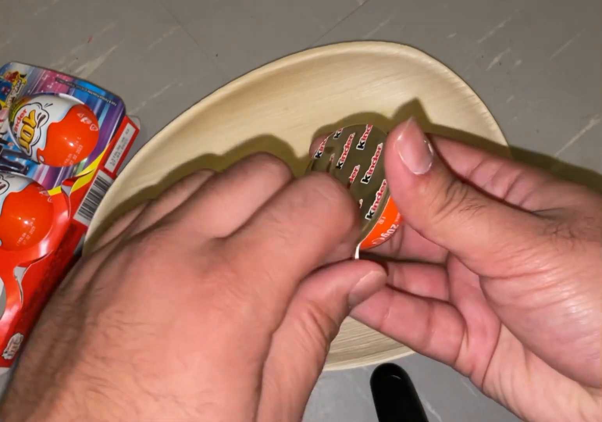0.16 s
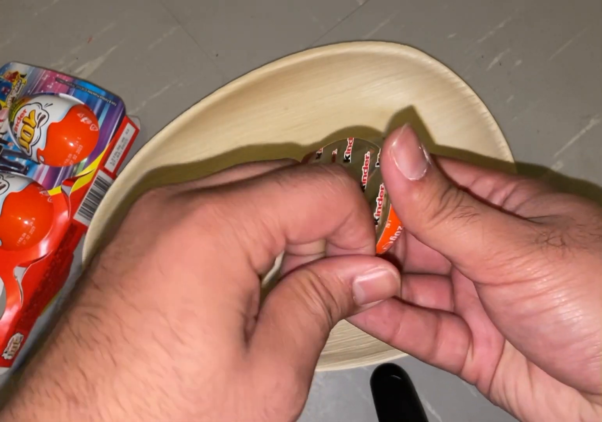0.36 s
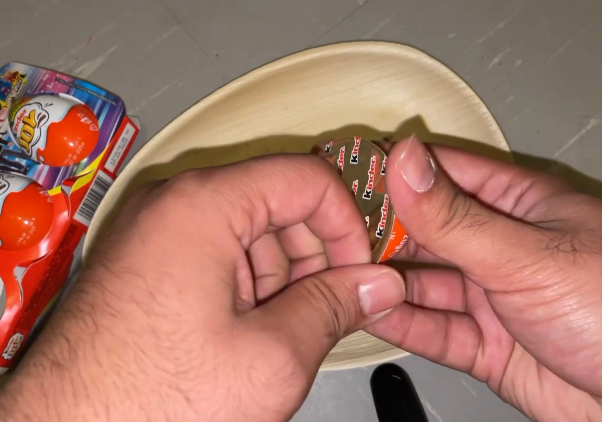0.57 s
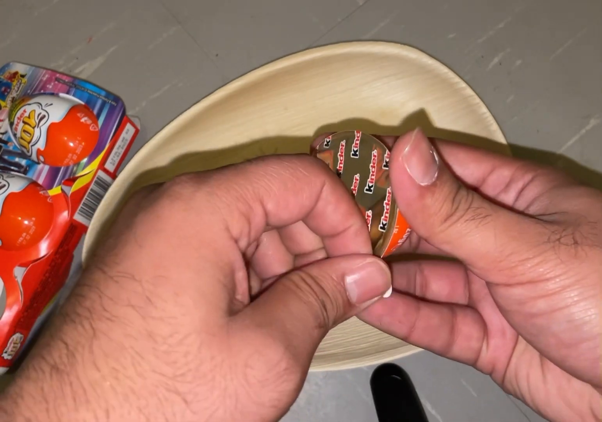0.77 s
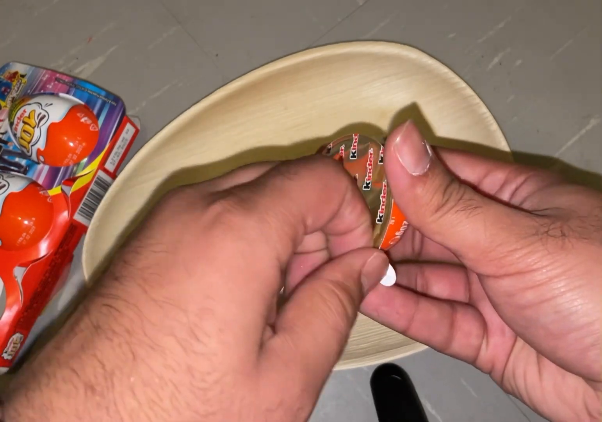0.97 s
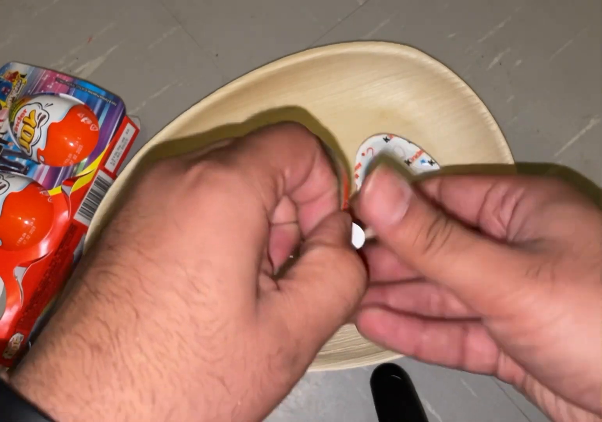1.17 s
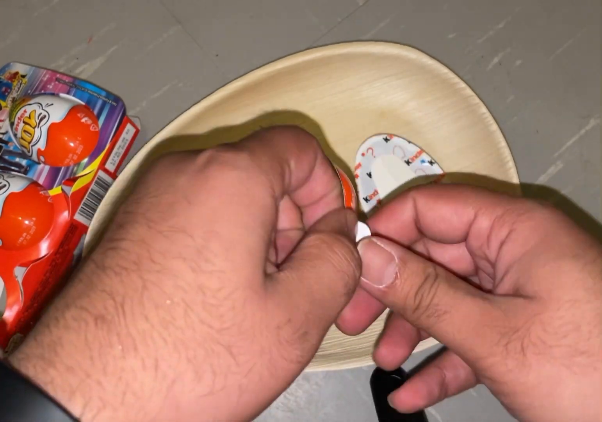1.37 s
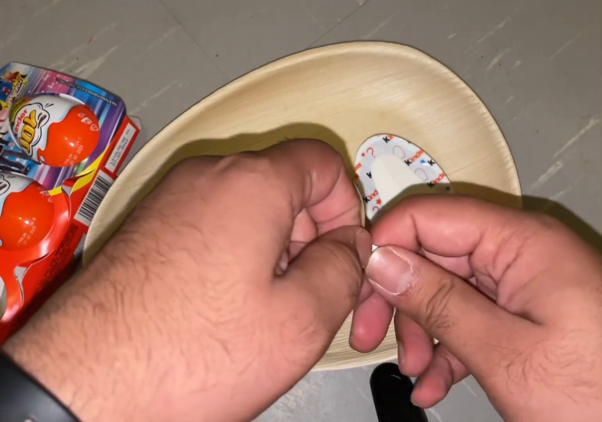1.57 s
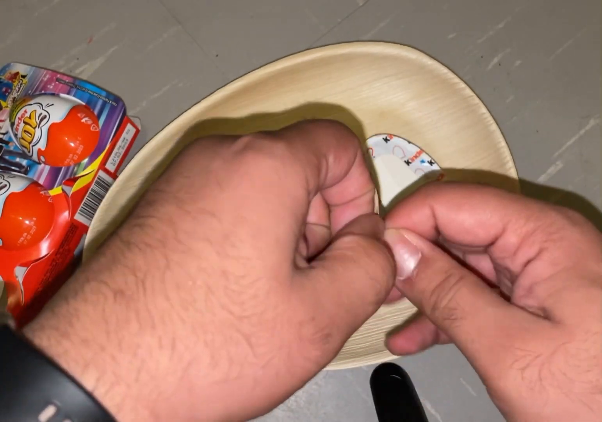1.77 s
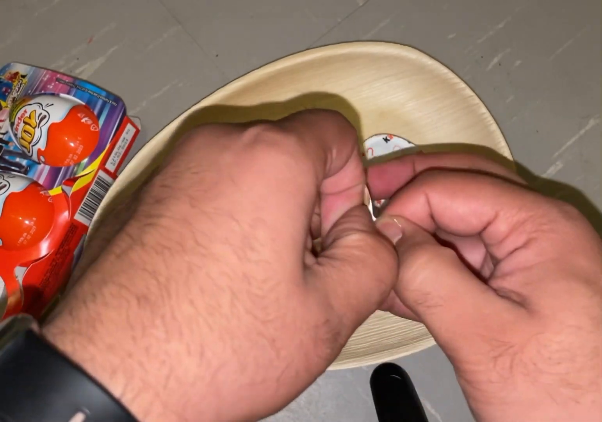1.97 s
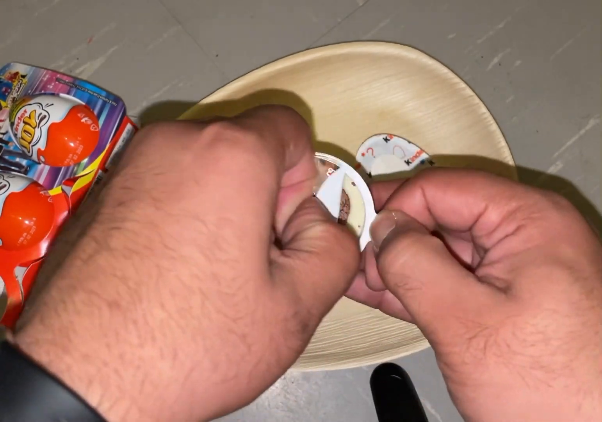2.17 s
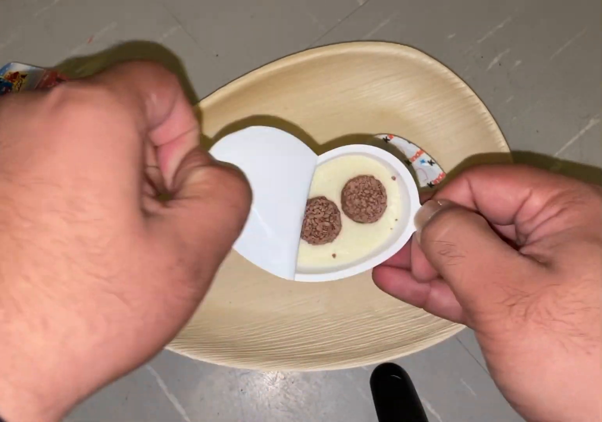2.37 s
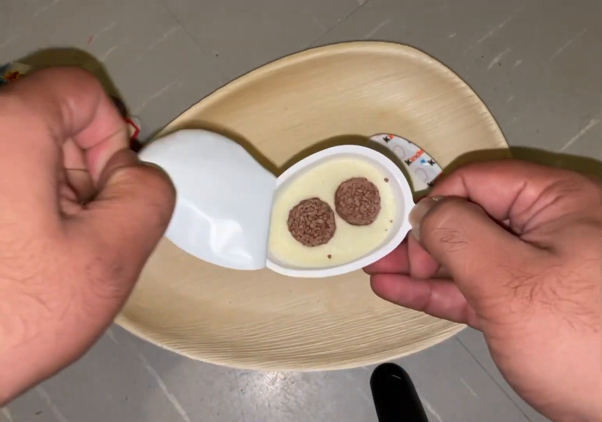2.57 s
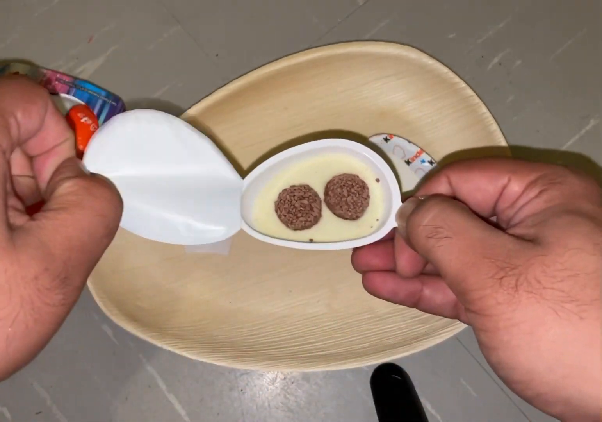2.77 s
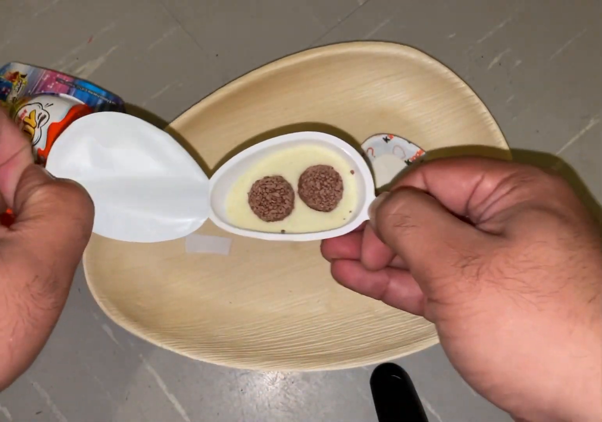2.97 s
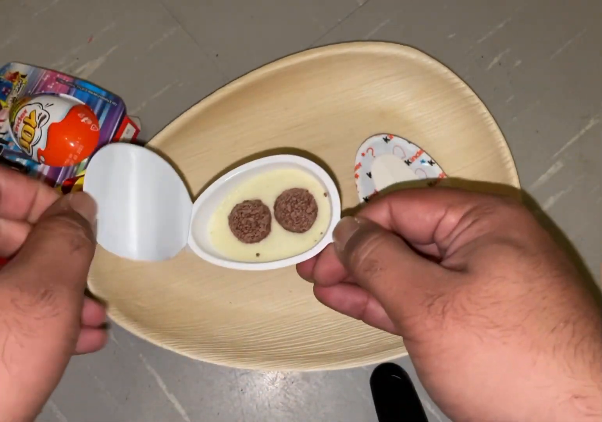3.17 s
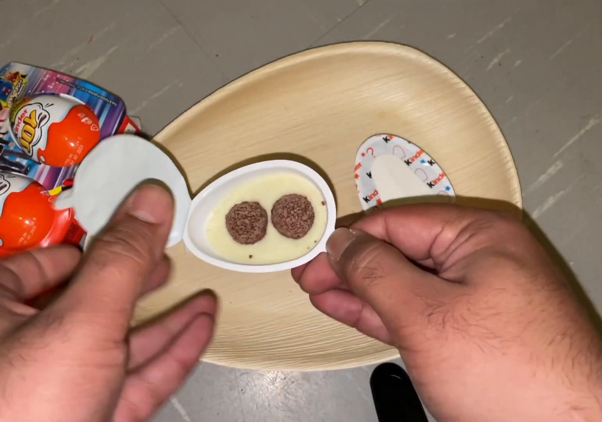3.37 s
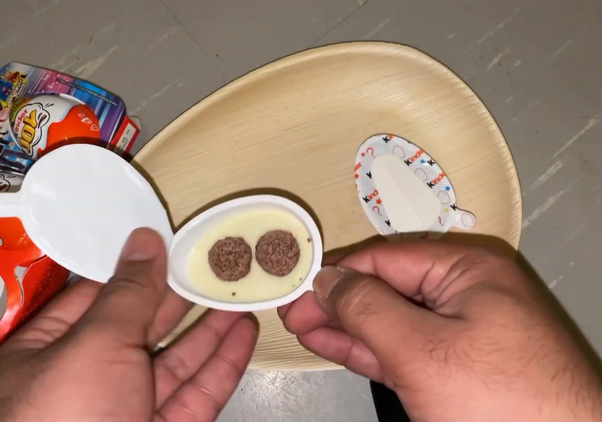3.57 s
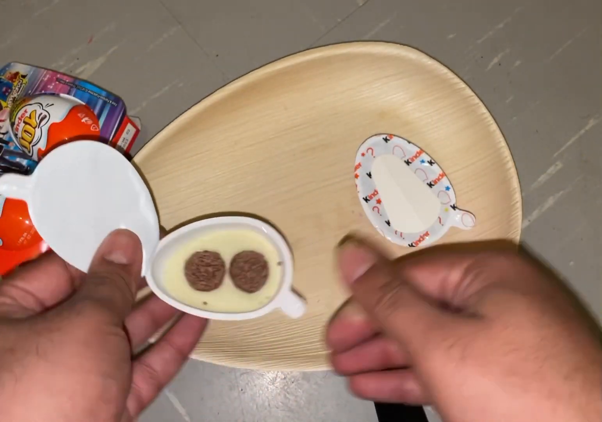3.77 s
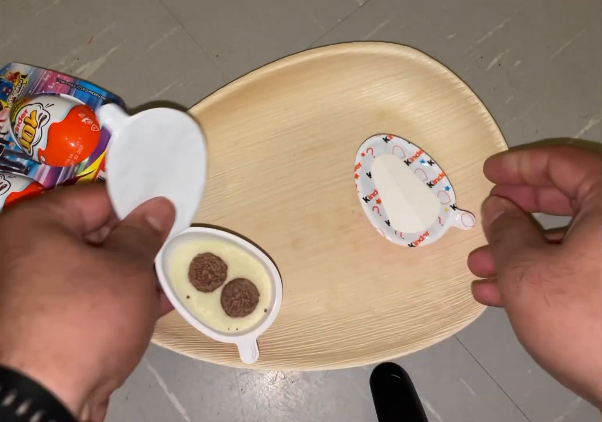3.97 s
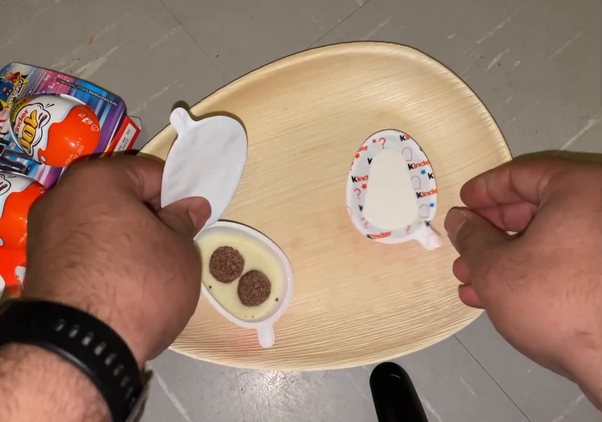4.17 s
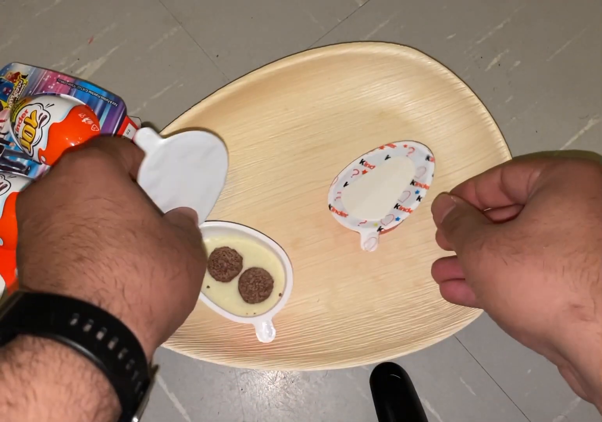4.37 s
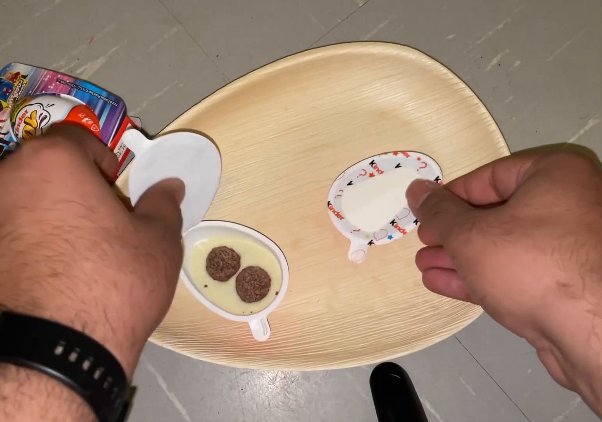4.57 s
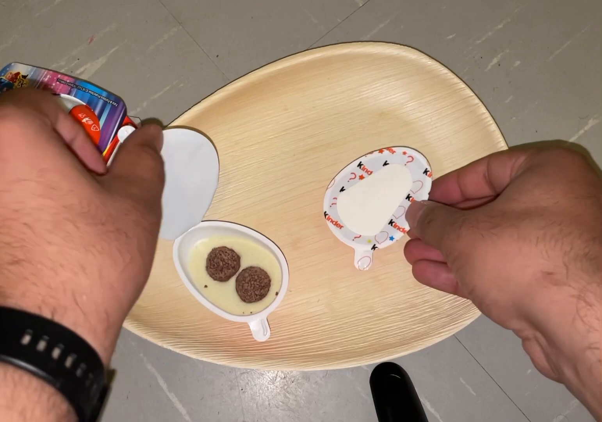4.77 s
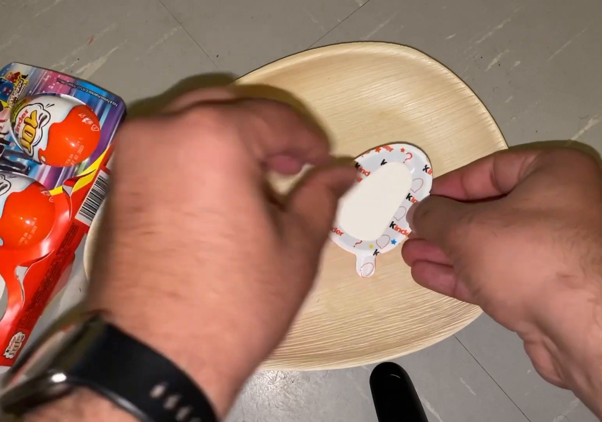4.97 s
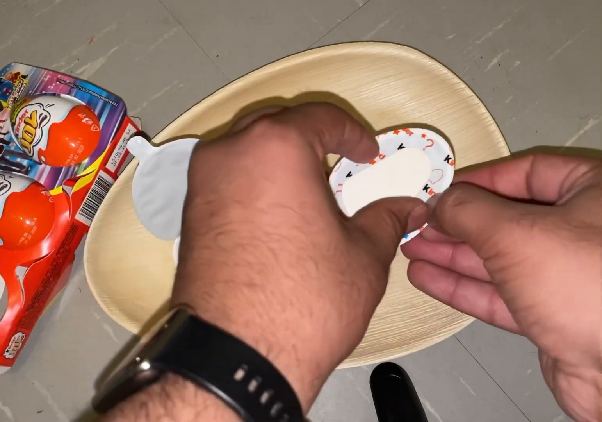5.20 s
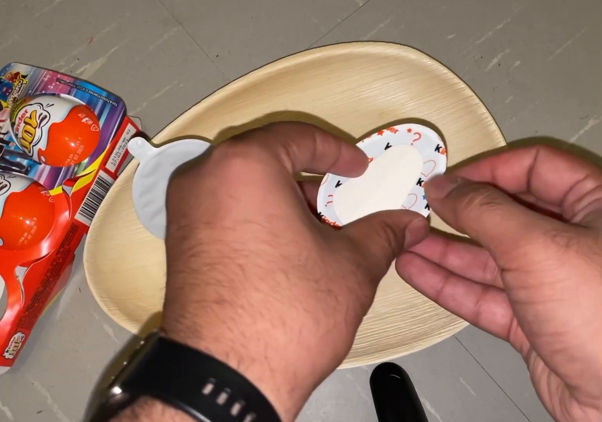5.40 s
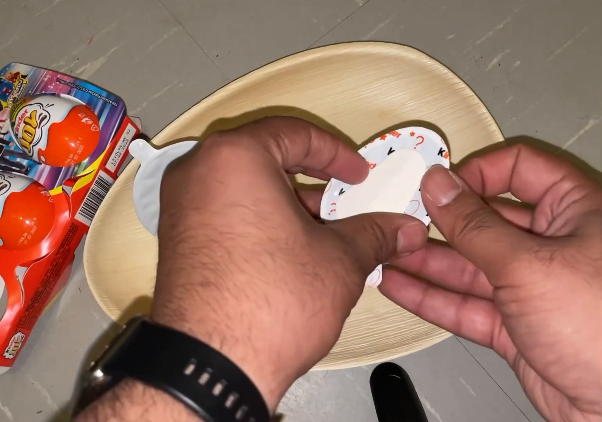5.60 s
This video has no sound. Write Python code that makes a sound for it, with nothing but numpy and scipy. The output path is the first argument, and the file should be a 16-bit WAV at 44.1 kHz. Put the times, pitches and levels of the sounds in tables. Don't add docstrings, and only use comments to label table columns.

```python
import sys
import numpy as np
from scipy import signal
from scipy.fft import rfft, irfft, next_fast_len
from scipy.io import wavfile
from scipy.ndimage import uniform_filter1d

SR = 44100
rng = np.random.default_rng(int(sys.argv[2]) if len(sys.argv) > 2 else 0)


def int16_out(signal):
    q = np.round(np.clip(np.atleast_2d(signal).T, -1, 1) * 32767)
    wavfile.write(sys.argv[1], SR, q.astype(np.int16))


def volts_from_decibels(level):
    exponent = np.asarray(level, float) / 20
    return 10 ** exponent


N = 248724

# (frequency [Hz], level [dB])
FOIL = [(900, -30), (1500, -6), (2400, -4.5), (3700, -1.5), (5300, -4.5), (7500, -6.5), (9000, -19),
        (11000, -55)]
CAVITY = 1980, 160, .7


def evened(x):
    return x / np.sqrt(np.mean(x ** 2) + 1e-20)


def peaked(x, db):
    return x * volts_from_decibels(db) / abs(x).max()


def read(points, hz):
    f, value = np.transpose(points)
    return np.interp(np.log(hz + 1), np.log(f + 1), value)


def add(mix, s, sound):
    part = mix[..., round(s * SR):][..., :sound.shape[-1]]
    part += sound[..., :part.shape[-1]]


def causal(points):
    half = np.log(volts_from_decibels(read(points, np.fft.rfftfreq(2048, 1 / SR))))
    full = np.r_[half, half[-2:0:-1]]
    phase = -signal.hilbert(full).imag
    taps = np.fft.ifft(np.exp(full + 1j * phase)).real[:1024]
    return taps / np.linalg.norm(taps)


def ring(x, hz, width):
    pole = np.exp((2j * hz - width) * np.pi / SR)
    return 2 * signal.lfilter([1 - abs(pole)], [1, -pole], x).real


def hollow(x):
    hz, width, _ = CAVITY
    return ring(x, hz, width)


def lean(s):
    # (time [s], left over right [dB])
    hands = [(0, 4), (2, 5), (2.7, 6), (3.2, 6.5), (3.6, 5), (4.2, 5.5), (5.6, 3)]
    db = np.interp(s, *np.transpose(hands)) / 2
    return volts_from_decibels(np.array([db, -db]).reshape(2, -1))


def air():
    # (frequency [Hz], density [dB per Hz])
    spectrum = [(12, -34), (20, -1), (81, -3.5), (234, -18.5), (347, -15.5), (485, -21.5), (698, -37.5),
                (759, -37), (897, -44.5), (2020, -48), (5230, -48), (8890, -53.5), (13900, -43.5),
                (16000, -59)]
    # (frequency [Hz], left-right likeness [ratio])
    likeness = [(60, 0.9), (400, 0.73), (1500, 0.72), (5000, 0.46), (13000, 0.99823)]
    frames, hz = N // 256 + 5, np.fft.rfftfreq(1024, 1 / SR)
    t = np.arange(frames) * 256 / SR
    a, b, c, d, patches = rng.standard_normal((frames, 513, 5)).T
    patches = uniform_filter1d(uniform_filter1d(patches, 10, 0), 16, 1)
    patches_db = 0.66 * evened(patches)
    creep_db = np.where(hz[:, None] < 85, 0, 1.3941 * t - 6)
    fading_db = 6 * np.exp(-t / 0.84)
    same = read(likeness, hz)[:, None]
    left = a + 1j * b
    right = same * left + np.sqrt(1 - same ** 2) * (c + 1j * d)
    level_db = read(spectrum, hz)[:, None] + patches_db + creep_db + fading_db
    z = np.array([left, right]) * volts_from_decibels(level_db)
    noise = signal.istft(z, nperseg=1024, noverlap=768)[1][:, :N]
    return volts_from_decibels(-67) * volts_from_decibels([[.9], [-.9]]) * evened(noise)


def room(x):
    # (frequency [Hz], t60 [s])
    walls = [(150, 0.52), (600, 0.33), (2000, 0.28), (5000, 0.3), (12000, 0.26), (15500, .14)]
    # (frequency [Hz], left-right likeness [ratio])
    likeness = [(100, 0.66), (500, 0.43), (2000, 0.16), (5000, 0.28), (8000, 0.53), (14000, 0.78)]
    taps = np.zeros((9, 30000))
    at = np.arange(200, 29980, 20) + rng.integers(0, 20, (9, 1489))
    np.put_along_axis(taps, at, rng.choice([-1., 1.], at.shape), 1)
    hz, t, z = signal.stft(taps, SR, nperseg=256)
    same = np.clip(read(likeness, hz), 0, 1)[:, None]
    own, common = z[:6].reshape(2, 3, *z.shape[1:]), z[6:]
    z = np.sqrt(same) * common + np.sqrt(1 - same) * own
    dying = volts_from_decibels(-60 * t / read(walls, hz)[:, None])
    tails = signal.istft(z * dying, SR, nperseg=256)[1]
    tails = tails / np.linalg.norm(tails[0, 0])
    turns = 2.3 * np.arange(N) / SR + np.arange(3)[:, None] / 3
    shares = np.cos(2 * np.pi * turns) * np.sqrt(2 / 3)
    return signal.fftconvolve((x * shares)[None], tails, axes=2).sum(1)[:, :N]


def plate(x):
    taps = np.zeros((2, 400))
    at = rng.integers(12, 400, (2, 7))
    echoes = .33 * rng.choice([-1., 1.], at.shape) * np.exp(-at / 250)
    np.put_along_axis(taps, at, echoes, 1)
    taps = signal.lfilter(*signal.butter(N=2, Wn=(1100, 6500), btype="band", fs=SR), taps)
    return x + signal.oaconvolve(x, taps, axes=1)[:, :N]


def blows(table, cycles, partner_db, top, grip):
    out, t = np.zeros(N), np.arange(9000) / SR
    for s, db, hz, t60 in table:
        phase = t * hz / cycles
        blow = phase * np.exp(-phase)
        grit = rng.standard_normal(len(t)) * blow ** 0.19
        width = 2.7 / (grip * t60)
        ratios = np.array([.58, .78, 1.3, 1.75, 2.4]) * rng.uniform(1.0, 1.08, 5)
        others = sum(ring(grit, hz * k, 1.1 * width) for k in ratios)
        body = peaked(ring(blow, hz, width), 0) + peaked(others, partner_db)
        band = signal.butter(N=2, Wn=(0.44 * hz, top * hz), btype="band", fs=SR)
        add(out, s, peaked(signal.lfilter(*band, body), db))
    return out


def knocking():
    # (time [s], peak [dB], ring [Hz], t60 [s])
    cup_knocks = [(0.121, -45, 958, 0.01594), (0.1885, -34.5, 757.3, 0.02751), (0.765, -51.5, 690, 0.03094),
                  (2.015, -53, 1976, 0.05176), (2.0545, -28, 1900, 0.0508), (2.056, -26, 954.7, 0.0358),
                  (2.062, -23, 1008, 0.02115), (2.0886, -16, 1050, 0.018), (2.192, -41, 1403, 0.05676),
                  (2.232, -21, 868, 0.01887), (2.253, -25, 813, 0.036), (2.278, -11.5, 968, 0.0499),
                  (2.312, -21, 760.2, 0.08088), (2.3622, -24, 600, 0.02058), (2.5487, -16.5, 910, 0.009828),
                  (2.782, -30, 420.9, 0.0686), (2.802, -38, 957.3, 0.037), (2.829, -44.5, 949.4, 0.03872),
                (3.07, -32, 711.2, 0.01253), (3.093, -41.5, 942.4, 0.02384), (3.143, -40.5, 784.7, 0.02),
                (3.288, -42.5, 599.8, 0.0234), (3.3251, -42, 1432, 0.025), (3.329, -42.5, 637, 0.0256),
                (3.3325, -42.5, 1296, 0.02544), (3.343, -51, 700.2, 0.0388), (3.352, -53.5, 1100, 0.0289),
                (3.376, -55.5, 949.8, 0.01515), (3.588, -54, 560.1, 0.03076), (3.622, -37.5, 886.4, 0.0344),
                (3.63, -46, 403.2, 0.0803), (3.742, -51, 1033, 0.0726), (4.084, -56, 1243, 0.0472),
                (4.119, -49, 1331, 0.05848), (4.148, -48, 1326, 0.1923), (4.172, -41, 1322, 0.01226),
                (4.183, -41.5, 330, 0.05308), (5.202, -52.5, 383.4, 0.0514)]
    # (time [s], peak [dB], ring [Hz], t60 [s])
    thumps = [(2.088, -43.5, 299.1, 0.2), (2.19, -55.5, 140, .15), (2.311, -39, 285, 0.07),
              (2.327, -36.5, 115, 0.088), (2.362, -32.5, 379.1, 0.07185), (2.548, -27, 311.2, 0.04529),
              (2.55, -25.5, 430.2, 0.03107), (2.557, -35, 104, 0.17), (2.8, -40.5, 382.2, 0.09975),
              (2.81, -45.5, 82.01, 0.095), (3.069, -46, 330, 0.09843), (3.102, -48, 131.9, 0.03667),
              (3.323, -47, 96.32, 0.11), (4.199, -44.5, 145.4, 0.1271), (4.214, -48.5, 83.74, 0.35),
              (5.204, -52, 215.6, 0.05382)]
    body = blows(cup_knocks, cycles=.15, partner_db=-1.8, top=3.5, grip=0.87)
    body = body + blows(thumps, cycles=0.28, partner_db=-1.5, top=4.3, grip=0.96)
    body = body + 1.3 * hollow(body)
    return body * volts_from_decibels([[1.3], [-1.3]])


def handling():
    # (start [s], foil [dB], time to fall 20 dB [s], fizz re foil [dB], cup re foil [dB])
    settles = [(0.0, -62.5, 0.0007, 2, -9.5), (.13, -60, 0.1403, -22, -9), (.775, -67, 0.0555, 1.5, -4),
               (1.12, -86, 0.0619, 19, -14), (1.72, -80.5, 0.1519, 5.5, -8.5),
               (2.1, -46, 0.1105, -21, -2.5), (2.24, -40.5, 0.1011, -9.5, -5),
               (2.28, -33, 0.0278, -19.5, -7), (2.29, -40, 0.1115, -9, -3), (2.555, -56, 0.0665, -3, 4),
               (2.6, -60, 0.1367, -2.5, -1), (2.792, -77, 0.0902, 4.5, 23.5),
               (3.15, -57.5, 0.09, -8.5, -7.5), (3.34, -68.5, 0.0171, -7, 10.5),
               (3.59, -64, 0.0534, 1, 6.5), (3.8, -84, 0.2294, 0, -11), (4.2, -61, 0.1527, -7.5, -7),
               (4.635, -71.5, 0.2194, 0, -14.5), (4.724, -64, 0.0919, -2.5, -4.5)]
    # (middle [s], foil [dB], time to fall 20 dB each side [s], fizz re foil [dB], panel resonance [Hz])
    strokes = [(.09, -76, 0.3392, -5, 1401), (.075, -73, 0.1774, -13.5, 950.3),
               (.185, -59, 0.0831, -10.5, 2129), (.385, -84.5, 0.1241, 5, 2703), (.54, -77, 0.07, 0, 4201),
               (.6, -75, 0.0438, 0, 3799), (1.0, -76, 0.0733, 3.5, 3905), (1.085, -73, 0.0908, 1.5, 1800),
               (1.42, -83, 0.1379, 2.5, 2000), (1.55, -75, 0.1227, 9.5, 1251),
               (1.86, -86, 0.5035, 4.5, 2000), (1.98, -82, 0.0331, 13.5, 3800),
               (2.018, -65, 0.0099, 0.5, 1996), (2.225, -41.5, 0.0316, -7.5, 1700),
               (2.51, -61, 0.071, -7, 1700), (3.72, -80, 0.1761, 7.5, 3492), (4.1, -63, 0.0296, 1.5, 2200),
               (4.145, -53, 0.0365, -8.5, 2122), (4.37, -72, 0.0863, 4, 3880),
               (4.52, -78, 0.1742, -6, 1700), (4.86, -78, 0.1159, 2, 1500), (4.98, -84, 0.1161, 0, 1450),
               (5.1, -81, 0.1325, -15, 1100), (5.255, -64.5, 0.0978, -8, 1801),
               (5.32, -61, 0.0746, -7, 1900), (5.36, -57.5, 0.0474, -6, 1800), (5.42, -64, 0.0626, 1, 2400),
               (5.44, -68, 0.0022, -6.5, 3503), (5.5, -75, 0.0128, 5, 2500), (5.57, -70, 0.0573, 6, 2100)]
    t = np.arange(0, N + 64, 64) / SR
    touches = []
    for s, db, fall, fizz_db, cup_db in settles:
        course_db = db + np.where(t < s, -99, -20 * (t - s) / fall)
        touches.append((course_db, fizz_db, cup_db, 2200))
    for s, db, fall, fizz_db, hz in strokes:
        course_db = db - 20 * abs((t - s) / fall) ** 2.3
        cup_db = -7 - 9 * np.log2(hz / 2000)
        touches.append((course_db, fizz_db, cup_db, hz))
    foil_db, fizz_db, cup_db, hz = map(np.array, zip(*touches))
    power = volts_from_decibels(2 * np.maximum(foil_db, -150))
    rest = volts_from_decibels(-96)
    rows = [np.sqrt(volts_from_decibels(2 * db) @ power) + rest for db in (0 * hz, fizz_db, cup_db)]
    rows.append(hz @ power / power.sum(0))
    return np.repeat(rows, 64, axis=1)[:, :N]


def rubbing():
    # (frequency [Hz], level [dB])
    skin = [(6500, -30.5), (8500, -6), (10500, -4), (13000, -1.5), (14200, -8), (15800, -17)]
    # (frequency [Hz], level [dB])
    cup = [(300, -30), (550, -6), (800, 2), (1200, 4), (1800, -12), (3000, -40)]
    t, out = np.arange(N) / SR, np.zeros((2, N))
    *level, panel_hz = handling()
    clumps = evened(uniform_filter1d(rng.standard_normal(N), 500))
    level = uniform_filter1d(level, 300) * volts_from_decibels(2.2 * clumps - 2.0)
    grains = rng.standard_normal((3, N)) * volts_from_decibels(1.6 * rng.exponential(1, (3, N)))
    grains *= rng.random((3, N)) < .3
    turn, r = np.exp(2j * np.pi * np.cumsum(panel_hz) / SR), np.exp(-np.pi * 750 / SR)
    panel = 2 * (turn * signal.lfilter([1 - r], [1, -r], grains[0] / turn)).real
    grains[0] += 3.1 * panel
    places = lean(t), 1, lean(t)
    for gain, grit, colour, place in zip(level, grains, (FOIL, skin, cup), places):
        out += gain * place * evened(signal.oaconvolve(grit, causal(colour))[:N])
    return out


def snaps():
    # (time [s], peak [dB], fizz above 9 kHz [dB], panel resonance [Hz])
    cracks = [(0.0085, -53, -66.5, 3255), (0.0964, -75, -77, 4339), (0.3684, -66.5, -61, 4160),
              (0.764, -41.5, -38, 3833), (1.4475, -58.5, -91, 1632), (1.7059, -51.5, -49, 6354),
              (1.7952, -75.5, -58, 6390), (2.0163, -58, -61.5, 2000), (2.0184, -54, -49, 2058),
              (2.0533, -24.5, -34, 1926), (2.0685, -12, -30.5, 2038), (2.2544, -19, -36, 4999),
              (2.3621, -25.5, -63.5, 3174), (2.5483, -19.5, -30.5, 2000), (2.7891, -52, -64, 3690),
              (3.1056, -33.5, -54, 1970), (3.143, -19, -25, 5451), (4.0931, -40.5, -60.5, 3550),
              (4.1004, -38.5, -58.5, 1501), (4.3394, -77, -64, 3410), (5.2011, -33.5, -52, 2099),
              (5.3445, -52, -74, 1485)]
    # (time [s], peak [dB], fizz above 9 kHz [dB], panel resonance [Hz])
    buckles = [(0.1883, -27, -55, 3347), (0.5988, -58.5, -90.5, 3550), (0.61, -52.5, -73, 1964),
               (0.9294, -81, -79, 3693), (1.078, -47.5, -50, 3773), (1.3894, -85, -84.5, 1820),
               (1.504, -61, -76, 3366), (2.0614, -19.5, -38.5, 4278), (2.0882, -12, -33.5, 4087),
               (2.1915, -43, -60, 1521), (2.23, -8, -16.5, 4981), (2.2328, -15.5, -24, 2573),
               (2.2772, -6, -24.5, 2709), (2.803, -53.5, -91, 2090), (2.9163, -73.5, -67, 1792),
               (3.0394, -75, -75.5, 3340), (3.0653, -48.5, -58, 2060), (3.0703, -24, -46, 3857),
               (3.0938, -39.5, -61.5, 4742), (3.2873, -45, -58.5, 3560), (3.332, -46, -58, 4700),
               (3.6229, -42.5, -64.5, 3824), (3.6328, -53, -62.5, 3896), (4.0582, -57.5, -69.5, 3342),
               (4.0854, -43, -58.5, 2110), (4.118, -39, -54, 2220), (4.1725, -25, -45, 3502),
               (4.1838, -33.5, -56.5, 5522), (4.4896, -56.5, -73, 2101), (4.638, -59.5, -72, 4737),
               (5.4243, -48, -66, 4747)]
    # (time [s], peak [dB], fizz above 9 kHz [dB], panel resonance [Hz])
    crinkles = [(0.1117, -58.5, -63.5, 2020), (0.1201, -34.5, -46.5, 2049), (1.0587, -51.5, -61.5, 1460),
                (1.9494, -66.5, -78, 2010), (2.0505, -28, -52, 2297), (2.2258, -29, -40, 3870),
                (2.2464, -23.5, -32.5, 2460), (2.3113, -25.5, -51, 2718), (2.323, -25, -55, 3301),
                (2.332, -25.5, -55, 4100), (2.342, -30, -58, 3706), (3.3241, -40, -51, 6624),
                (3.5871, -58, -71, 3620), (3.7443, -45.5, -56, 4530), (3.7514, -54, -52, 2298),
                (4.1515, -35, -47.5, 5822), (4.1605, -41, -49.5, 4176), (4.7252, -50, -63.5, 2110),
                (5.2717, -56, -83.5, 1431), (5.2954, -50.5, -78, 1815), (5.4188, -55.5, -68, 2390)]
    # (frequency [Hz], level [dB])
    covered = [(500, -31), (1200, -4), (2000, -6.5), (3500, -6), (5500, -12.5), (8000, -53)]
    # (frequency [Hz], level [dB])
    sparkle = [(6500, -23.5), (8500, 0), (10500, 0.5), (13000, -3), (15000, -7.5), (16500, -20)]
    lead = .008
    out, t = np.zeros((2, N)), np.arange(3000) / SR - lead
    foil, dull, fizz = causal(FOIL), causal(covered), causal(sparkle)
    kinds = (cracks, .017), (buckles, 0.029), (crinkles, .062)
    events = sorted((*row, t60) for table, t60 in kinds for row in table)
    for s, db, fizz_db, hz, t60 in events:
        a, b, c = rng.standard_normal((len(t), 3)).T
        fade = volts_from_decibels(-60 * t / t60) * np.clip(t / 0.00048, 0, 1)
        creep_db = -17 + 22 * np.minimum(t, 0) / lead
        fade = fade + (t < 0) * volts_from_decibels(creep_db)
        shower = a * volts_from_decibels(3.2 * c) * fade * (1 + 0.8 * np.exp(-abs(t) / 0.0019))
        shower = shower + 6.959 * (.017 / t60) ** .6 * np.sinc((t - .0006) * SR * .8)
        muffled = np.clip((db - fizz_db - 12) / 18, 0, 1)
        colour = (1 - muffled) * foil + muffled * dull
        panel = ring(shower, hz, .24 * hz)
        struck = shower + 1.3 * panel + CAVITY[2] * hollow(shower)
        sheet = signal.oaconvolve(struck, colour)[:len(t)]
        bright = signal.oaconvolve((shower + 0.64 * b * fade) * fade ** 0.091, fizz)[:len(t)]
        add(out, s - lead, peaked(sheet, db) * lean(s) + peaked(bright, fizz_db + 11.5))
    return out


def scene():
    near = plate(snaps() + knocking() + rubbing())
    return near + volts_from_decibels(-13.0) * room(near.mean(0)) + air()


def roll_off(x):
    return signal.sosfilt(signal.butter(12, 16780, fs=SR, output="sos"), x)


def record(dry):
    # (frequency [Hz], left leads by [rad])
    lead = [(100, .15), (600, .4), (1200, .6), (2500, 1.1), (4500, 1.2), (5700, -.9), (7100, -1.7),
            (7700, -2.8), (9300, -3.4), (10900, -4.7), (12600, -5.8), (16400, -6.3)]
    # (frequency [Hz], level [dB])
    response = [(9000, 0.5), (13500, -0.5), (14800, -4.5), (16000, -14), (16700, -25.5)]
    size = next_fast_len(N + 2048)
    hz = np.fft.rfftfreq(size, 1 / SR)
    turn = np.exp(.5j * read(lead, hz))
    spectrum = rfft(dry, size) * np.array([turn, 1 / turn]) * volts_from_decibels(read(response, hz))
    ports = irfft(spectrum, size)[:, :N]
    return roll_off(ports)


dry = scene()
out = record(dry)
int16_out(out)
```